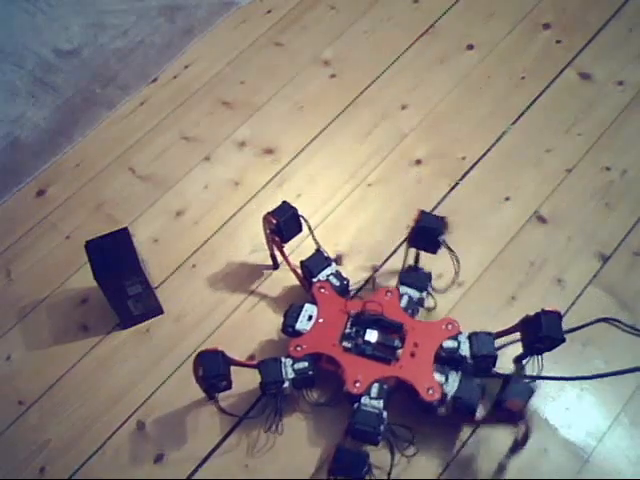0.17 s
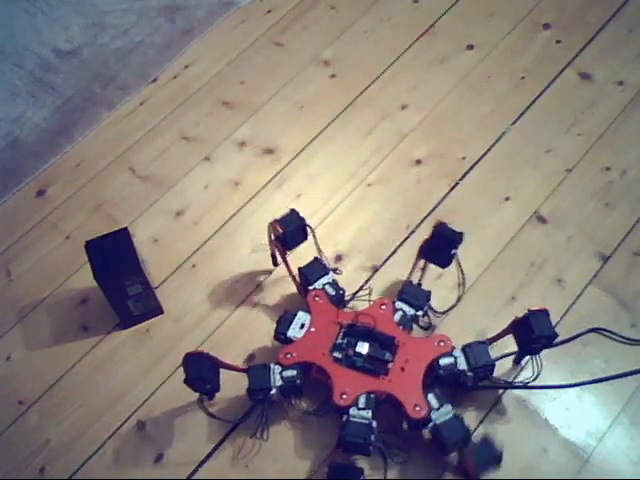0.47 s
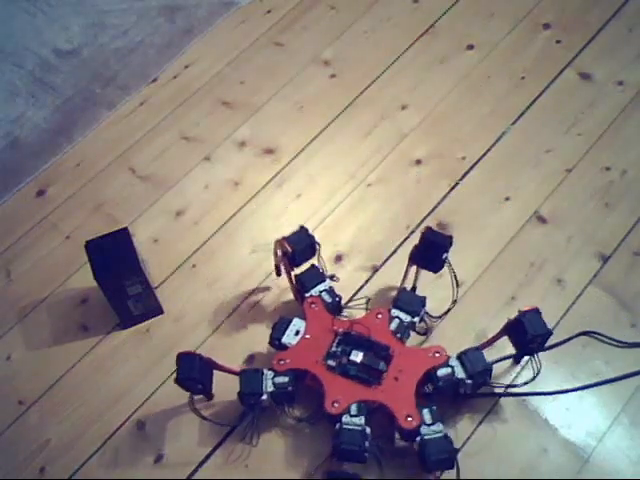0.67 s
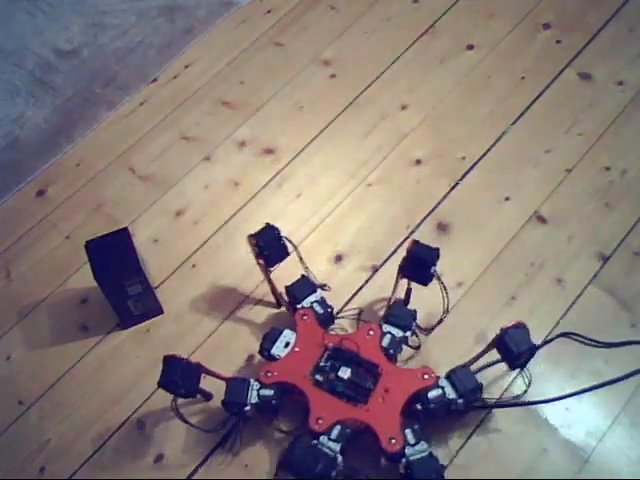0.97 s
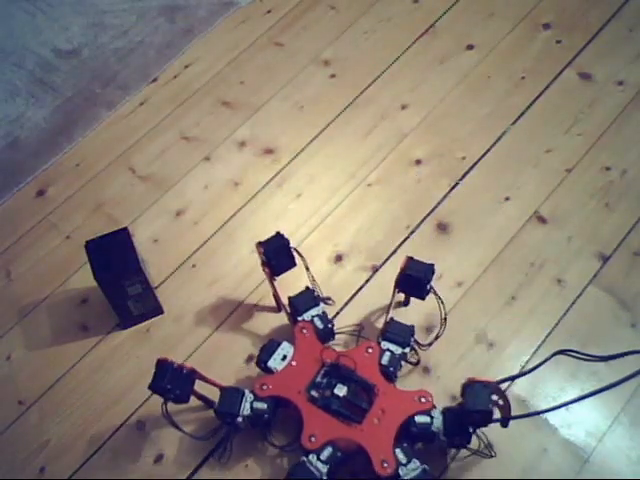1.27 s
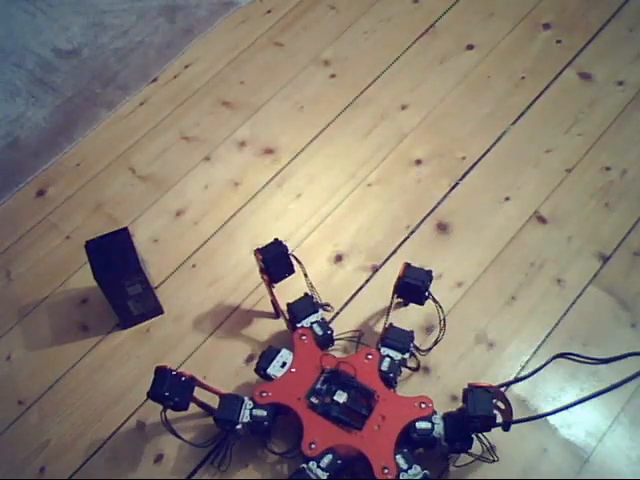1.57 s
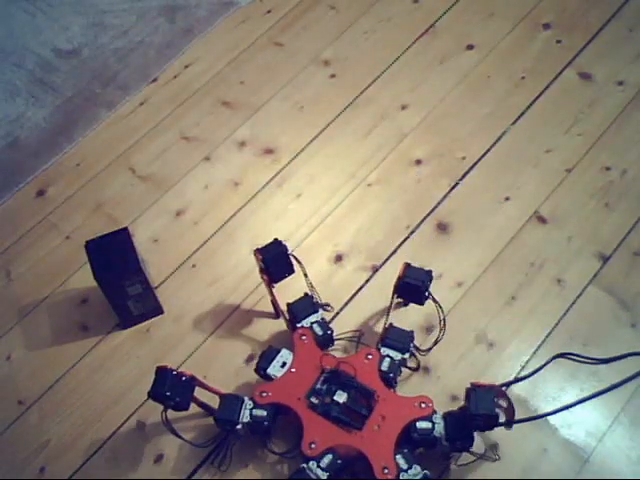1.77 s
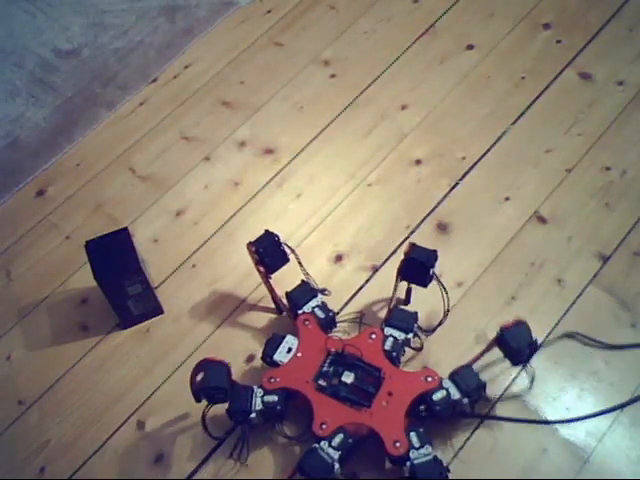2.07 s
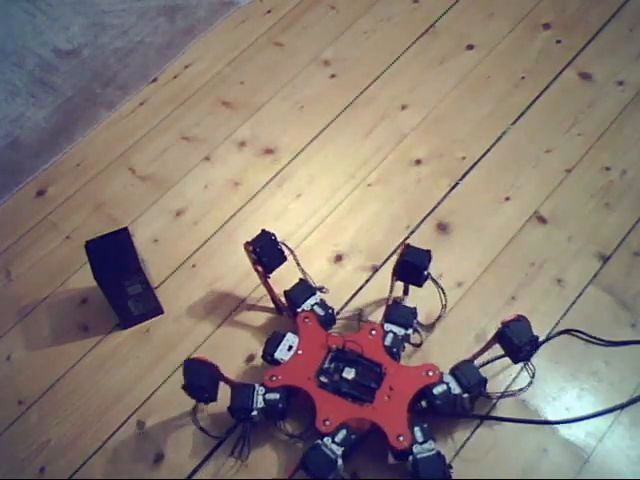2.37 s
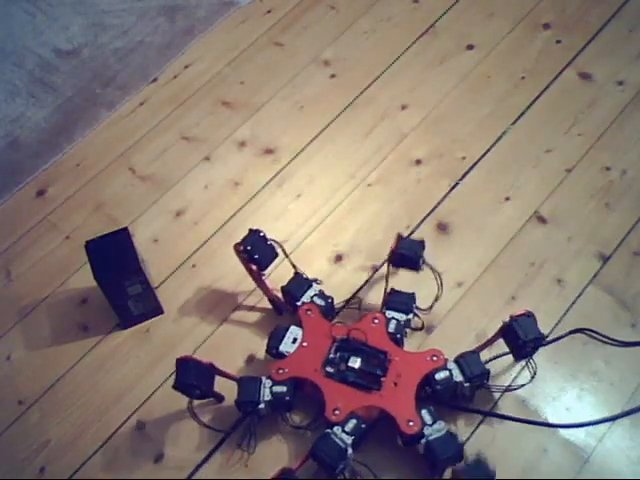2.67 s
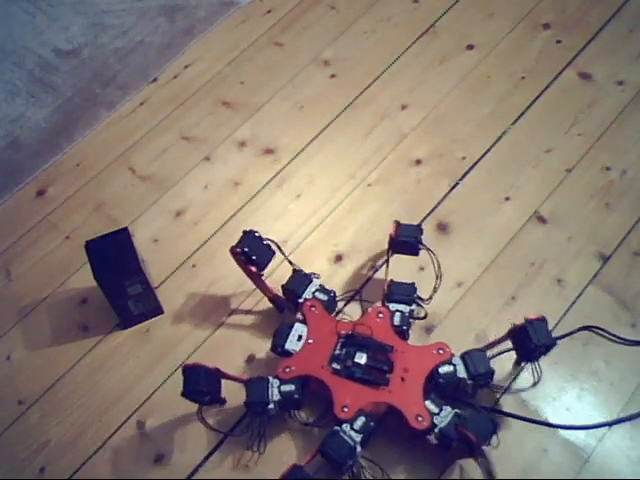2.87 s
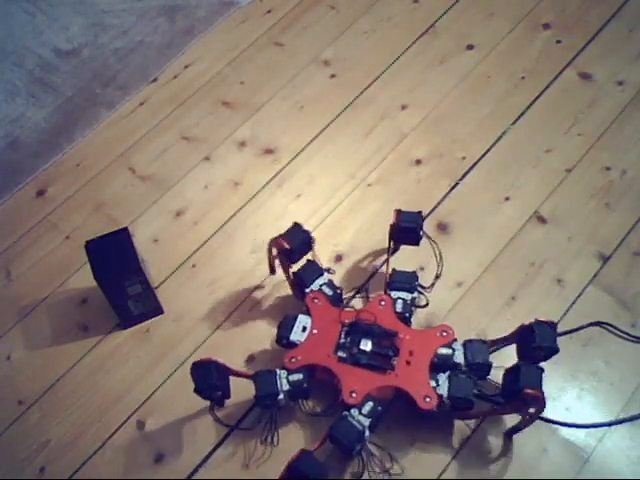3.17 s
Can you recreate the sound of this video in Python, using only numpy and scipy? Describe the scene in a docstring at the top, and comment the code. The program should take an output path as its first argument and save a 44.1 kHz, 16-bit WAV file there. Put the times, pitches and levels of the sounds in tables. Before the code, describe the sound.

Small robot servo motors whirr and rasp in short bursts, pausing twice on a wooden floor indoors

```python
"""In a small room with a wooden floor, a six-legged robot walks, pausing twice.
Its servos run in short bursts: gear teeth tick and rasp in plastic housings, and a whine follows each motor's speed.
Some gears sing out above the rasp, and slack gears snap over as a leg stops.
Servos that hold a load sing at their drive frequency; feet knock and scuff the boards.
A low rumble with a faint hiss fills the room."""
import sys
import numpy as np
from scipy import signal
from scipy.fft import rfft, irfft, next_fast_len
from scipy.io import wavfile

SR = 44100
rng = np.random.default_rng(int(sys.argv[2]) if len(sys.argv) > 2 else 0)


def to_wav(sig):
    """Store sig (one row per channel, or 1-D mono) as 16-bit WAV at the path in sys.argv[1].

    Samples outside -1..1 are clipped; the rate is SR.
    """
    pcm = np.clip(np.atleast_2d(sig), -1, 1) * 32767
    pcm = np.round(pcm).astype(np.int16)
    wavfile.write(sys.argv[1], SR, pcm.T)  # frames by channels


N = 145971  # samples, about 3.3 s
ROOM_T60_S, ROOM_DB = 0.3, -5.5  # time for the room's tail to fall by 60 dB; its level beside the direct sound

# Leg moves: (start [s], length [s], level before the sag [dB], tooth rate at full speed [Hz],
# gear wobble at full speed [Hz], treble boost [dB], ringing of that leg [Hz], its strength [dB])
MOVES = [(-.06, 0.22, -40.5, 891, 120.3, 2.5, 6570, -14), (0.188, 0.12, -39.5, 891.2, 95.2, 3.5, 6830, -14),
         (0.315, 0.17, -44, 842, 60, 2, 6800, -18.5), (0.486, 0.12, -37.5, 1255, 69.2, 1, 8150, -12),
         (0.601, 0.14, -41, 1133, 107, 2, 6780, -23), (0.693, 0.085, -39, 1484, 161, 0, 8700, -7),
         (0.791, 0.12, -39, 1158, 93, 1.5, 7650, -12), (0.907, 0.2, -44, 972, 49.6, -0.5, 5880, -10),
         (1.094, 0.16, -34.5, 1098, 150, 1.5, 6840, -11), (1.235, 0.16, -37, 1301, 83.56, 0.5, 7450, -12),
         (1.387, 0.026, -39.5, 711.6, 109, -4.5, 7000, -25.5), (1.88, 0.14, -39, 1204, 93, 0, 6730, -34),
         (2.018, 0.18, -42, 1335, 75.3, -1, 6640, -14.5), (2.378, 0.3, -45.5, 1075, 72, -1.5, 4630, -15.5),
         (2.687, 0.14, -36.5, 1015, 110.3, 6, 6720, -15), (2.83, 0.15, -40, 1196, 77.4, 1, 4840, -39),
         (2.993, 0.15, -40.5, 1163, 80, 0.5, 6900, -24), (3.146, 0.12, -41.5, 1088, 99, -3, 7000, -15)]
FRAME_HZ, FRAME_WIDTH_HZ, FRAME_DB = 1826.7, 520, -58.5
FRAME_FOLLOW = 0.28  # below 1, the drone changes less than the motors' effort


def servos():
    """All the leg moves, each from its own place in the room, and the drone that they stir in the frame."""
    out, effort = np.zeros((2, N))
    for start, *settings in MOVES:
        sound, push = move(*settings)
        add(out, start, room(bounce(sound), ROOM_DB))
        add(effort, start, push)
    drone = rng.standard_normal(N)
    for _ in range(2):
        drone = ring(drone, FRAME_HZ, FRAME_WIDTH_HZ)
    return out + amp(FRAME_DB) * unit(drone * effort ** FRAME_FOLLOW)


SPIN_UP_S, COAST_S, SAG_DB_PER_S = 0.052, 0.03, -9.5
SLOW_SHARE, SPEED_WAVER = 0.8, 0.02  # speed at the ends of a move, and its unsteadiness, as shares
WOBBLE, CHATTER_DB = 0.17, 1.0  # depth of the gear wobble; size of the faster loudness wander
TOOTH_SPREAD_DB, RASP_DB, LEG_WIDTH_HZ = 6, 9, 440
FIZZ_HZ = 12300  # the treble boost is full from here up
WHINE_DB, MESH_ROUGH = -12.5, 0.8  # level beside the gears; roughness 0-1
# Tones of the whine, before the housing colours them: (multiple of the tooth rate, level [dB])
WHINE_TONES = [(4, 5.5), (5, 6), (6, 10)]
# How the plastic housing colours sound: (frequency [Hz], relative level [dB])
HOUSING = [(300, -26), (1100, -14), (2600, -14), (3300, -10), (4000, -4.5), (4800, 1.5), (5900, -1.5),
           (6800, 2.5), (8200, 0.5), (10000, 2), (11050, -9.5), (13000, -16.5), (15500, -13.5)]


def move(length, db, tooth_hz, wobble_hz, fizz_db, leg_hz, leg_db):
    """One servo speeds up, slows and coasts: uneven ticks, sliding rasp, rough whine. Returns sound and effort."""
    t = np.arange(0, length + 5 * COAST_S, 1 / SR)
    spin_up = np.sin(np.pi / 2 * np.minimum(t / SPIN_UP_S, 1)) ** 2
    coast = np.exp(-np.maximum(t - length, 0) / COAST_S)
    effort = amp(db + SAG_DB_PER_S * t) * spin_up * coast

    arch = np.sin(np.pi * np.minimum(t / (length + COAST_S), 1))
    speed = (SLOW_SHARE + (1 - SLOW_SHARE) * arch) * (1 + SPEED_WAVER * drift(t, rate_hz=60))
    travel = np.cumsum(speed) / SR
    teeth = travel * tooth_hz  # running count of teeth

    strength, slide = rng.standard_normal((len(t), 2)).T
    tooth_passes = np.diff(np.floor(teeth), prepend=0)
    ticks = tooth_passes * amp(TOOTH_SPREAD_DB * np.clip(strength, -2, 2)) * np.sign(slide)
    rasp = slide * (0.96 + np.exp(-(teeth % 1) / 0.19))  # strongest just after each tooth meets
    gears = unit(ticks) + amp(RASP_DB) * unit(rasp)
    gears = shape(gears, lambda f: amp(fizz_db * np.minimum(f / FIZZ_HZ, 1) ** 4))
    gears = colour(gears, HOUSING)
    gears = unit(gears + amp(leg_db) * unit(ring(gears, leg_hz, LEG_WIDTH_HZ)))

    whine = sum(amp(level) * strand(k * teeth, MESH_ROUGH) for k, level in WHINE_TONES)
    whine = colour(whine, HOUSING)
    wobble = unit(1 + WOBBLE * np.sin(2 * np.pi * wobble_hz * travel))
    chatter = amp(CHATTER_DB * drift(t, rate_hz=350))
    return effort * wobble * chatter * (gears + amp(WHINE_DB) * whine), effort


BOUNCE_S, BOUNCE_SHIFT_S, BOUNCE_DB = 0.0016, 0.000163, -9.5  # average delay, its drift, echo level


def bounce(x):
    """The floor reflects a servo with a delay that shifts as the leg swings, so its colour keeps changing."""
    t = np.arange(len(x)) / SR
    delay = BOUNCE_S * (0.5 + rng.random()) + BOUNCE_SHIFT_S * drift(t, rate_hz=5.02)
    fine = signal.resample_poly(x, 4, 1)  # finer steps let the delay slide smoothly
    fine_t = np.linspace(0, len(x) / SR, len(fine), endpoint=False)
    echo = np.interp(t - delay, fine_t, fine, left=0)
    return (x + amp(BOUNCE_DB) * echo) / np.hypot(1, amp(BOUNCE_DB))


WHINE_WAVER, WHINE_ROOM_DB = 0.0036, -7.5  # pitch unsteadiness as a share; level of the room's tail
# Gears that sing out above the rasp: (start [s], length [s], pitch at start [Hz],
# in the middle [Hz], at the end [Hz], level [dB], roughness [0-1])
WHINES = [(0.088, 0.084, 2790, 2660, 2390, -59.5, .7), (.075, .095, 5400, 5230, 5050, -49.5, .5),
          (.82, 0.075, 5660, 5789, 5640, -48.5, .55), (.94, .11, 5700, 5750, 5400, -52, .55),
          (1.126, 0.131, 7000, 6640, 5890, -40.5, 0.7), (1.145, .095, 2850, 3290, 2800, -53, .35),
          (1.15, .105, 2680, 2770, 2370, -57, .45), (1.32, 0.0876, 4100, 3693, 3300, -56.5, .8),
          (1.92, 0.143, 3414, 3720, 3393, -54, .9), (2.101, 0.13, 4340, 4150, 3800, -55, 1),
          (2.849, 0.11, 4840, 4770, 4570, -48, 0.78), (3.182, 0.1, 2800, 3290, 2820, -61, .6)]


def whines():
    """A fast gear sings briefly, gliding with the speed of its motor."""
    out = np.zeros(N)
    for start, length, *pitch_hz, db, rough in WHINES:
        t = np.arange(0, length, 1 / SR)
        glide = np.polyfit([0, 0.5, 1], pitch_hz, 2)
        hz = np.polyval(glide, t / length) * (1 + WHINE_WAVER * drift(t, rate_hz=84.4))
        swell = np.sin(np.pi * t / length) ** 0.5
        add(out, start, amp(db) * swell * strand(np.cumsum(hz) / SR, rough))
    return out


WHINE_SPREAD = 0.065  # half width of a rough whine, as a share of its pitch


def strand(turns, rough):
    """A gear-mesh tone: a clean line, blurred by uneven teeth into a narrow band that glides with it."""
    t = np.arange(len(turns)) / SR
    spread_hz, rough = WHINE_SPREAD * turns[-1] / t[-1], np.clip(rough, 0, 1)
    phase = 2 * np.pi * turns
    blur = unit(drift(t, spread_hz) * np.cos(phase) + drift(t, spread_hz) * np.sin(phase))
    return np.sqrt(2 * (1 - rough ** 2)) * np.sin(phase) + rough * blur


SNAP_DECAY_S = 0.00092
# Slack gears snapping over as a leg stops: (time [s], peak level [dB])
SNAPS = [(0.782, -30), (1.4632, -31), (1.5068, -38)]


def snaps():
    """Slack gear teeth knock together once and tick the housing."""
    out, t = np.zeros(N), np.arange(SR // 50) / SR
    for start, db in SNAPS:
        tick = colour(rng.standard_normal(len(t)) * np.exp(-t / SNAP_DECAY_S), HOUSING)
        add(out, start, amp(db) * tick / abs(tick).max())
    return out


DRIVE_HZ, DRIVE_WAVER_DB = 1953, 1.1  # the waver grows with each harmonic
SECOND_DB, FIFTH_DB = -12, -11.5  # harmonics that are the same in every hold
HOLD_FADE_S = 0.02
# Servos holding a load: (start [s], length without the added fade time [s], level [dB],
# 3rd harmonic [dB], 4th harmonic [dB])
HOLDS = [(1.468, 0.0676, -66, 0, -10.5), (1.539, 0.063, -63.5, -12, -2), (1.6, 0.11, -64, 1, -13),
         (1.718, 0.1, -63, -15.5, -7), (1.832, 0.1, -60, -4, -9), (2.244, 0.3, -62.5, -7.5, -5),
         (2.55, 0.15, -57, -12, -29), (2.79, 0.47, -60, -12.5, -6)]


def holding():
    """The pulsed drive current makes loaded motors sing on one thin pitch; its overtones shift with the load."""
    out = np.zeros(N)
    for start, length, db, third_db, fourth_db in HOLDS:
        t = np.arange(0, length + HOLD_FADE_S, 1 / SR)
        turn = 2 * np.pi * DRIVE_HZ * (t + round(start * SR) / SR)  # all holds share one clock
        tone = np.zeros(len(t))
        for k, level in enumerate([0, SECOND_DB, third_db, fourth_db, FIFTH_DB]):
            waver_db = DRIVE_WAVER_DB * np.sqrt(k + 0.5) * drift(t, rate_hz=18)
            tone += amp(level + waver_db) * np.sin((k + 1) * turn)
        fade = np.minimum(np.minimum(t, t[-1] - t) / HOLD_FADE_S, 1)
        add(out, start, np.sqrt(2) * amp(db) * tone * fade)
    return out


SCUFF_GRAIN_DB = -0.5  # size of the quick loudness wander
# Feet knocking (short) or scuffing (long): (start [s], fade time [s], level before the fades [dB])
SCUFFS = [(.772, .009, -48), (1.12, .009, -47), (2.136, .011, -45.5), (2.165, .075, -55), (2.858, .04, -56)]
# How the floorboards sound: (frequency [Hz], relative level [dB])
BOARD = [(150, -18), (500, 6.5), (1100, 12), (1800, 4), (3500, -14), (9000, -42)]


def feet():
    """Each foot lands and slips in small grains that sound the floorboards."""
    out = np.zeros(N)
    for start, length, db in SCUFFS:
        t = np.arange(0, 3 * length, 1 / SR)
        grains = rng.standard_normal(len(t)) * amp(SCUFF_GRAIN_DB * drift(t, rate_hz=220))
        fade = np.minimum(t / 0.0033, 1) * np.exp(-(t / length) ** 2)
        add(out, start, amp(db) * colour(grains, BOARD) * fade)
    return out


FLOOR_DB, RUMBLE_TOP_HZ = -35, 60
# Room rumble and hiss: (frequency [Hz], relative level [dB])
ROOM_NOISE = [(14, 8), (25, 1.5), (45, -3), (75, -6), (100, -10), (135, -12.5), (170, -16), (250, -19.5),
              (400, -28), (870, -38.5), (1300, -44), (2200, -50), (6000, -46), (10000, -54), (12500, -63.5),
              (15500, -47.5)]
# Gain of the deepest rumble as time passes: (time [s], level [dB])
RUMBLE = [(0, -1), (.7, -1), (1, 2.5), (1.5, -4), (2.1, -1), (3.3, -3.5)]


def background():
    """Low rumble with a faint hiss above it; the deepest part swells, dips and partly returns."""
    noise = colour(rng.standard_normal(N), ROOM_NOISE)
    low = shape(noise, lambda f: 1 / (1 + (f / RUMBLE_TOP_HZ) ** 4))
    low_gain = amp(np.interp(np.arange(N) / SR, *np.transpose(RUMBLE)))
    noise = noise + low * (low_gain - 1)
    return amp(FLOOR_DB) * unit(shape(noise, lambda f: f ** 2 / (f ** 2 + 10 ** 2)))


def room(x, wet_db):
    """Adds a short tail of scattered reflections."""
    t = np.arange(SR // 2) / SR
    hits = rng.random(len(t)) < 3000 / SR  # about 3000 reflections a second
    taps = rng.standard_normal(len(t)) * hits * (t > 0.003) * amp(-60 * t / ROOM_T60_S)
    return signal.fftconvolve(x, (t == 0) + amp(wet_db) * taps / np.linalg.norm(taps))


def amp(db):
    """Decibels to gain."""
    return 10 ** (np.asarray(db) / 20)


def unit(x):
    """Scales to rms (average strength) 1."""
    return x / np.sqrt(np.mean(x ** 2) + 1e-20)


def add(mix, s, sound):
    """Mixes a sound in at a time in seconds, cutting off what falls outside."""
    at = round(s * SR)
    sound = sound[max(-at, 0):]
    part = mix[max(at, 0):][:len(sound)]
    part += sound[:len(part)]


def shape(x, gain):
    """Filters by a gain given as a function of frequency."""
    size = next_fast_len(len(x) + 2048)
    return irfft(rfft(x, size) * gain(np.fft.rfftfreq(size, 1 / SR)), size)[:len(x)]


def colour(x, points):
    """Filters a signal through a curve of (frequency [Hz], level [dB]) points, then scales it to rms 1."""
    hz, db = np.transpose(points)
    return unit(shape(x, lambda f: amp(np.interp(np.log(f + 1), np.log(hz), db))))


def ring(x, hz, width_hz):
    """One resonance with gain 1 at its peak."""
    return signal.lfilter(*signal.iirpeak(hz, hz / width_hz, SR), x)


def drift(t, rate_hz):
    """Smooth random wandering of about rms 1: 16 slow waves at rates up to rate_hz."""
    draw = rng.random((16, 2))
    waves = np.sin(2 * np.pi * (rate_hz * draw[:, :1] * t + draw[:, 1:]))
    return waves.sum(0) / np.sqrt(8)


def scene():
    """The robot in the room."""
    singing = room(whines(), WHINE_ROOM_DB)[:N]
    knocks = room(feet() + snaps(), ROOM_DB)[:N]
    return (servos() + singing + knocks + holding() + background())[None]


NOTCH_HZ, NOTCH_WIDTH_HZ, EDGE_HZ = 12000, 520, 15700


def record(dry):
    """Leaves a narrow gap in the treble around 12 kHz, then limits the band at the top."""
    x = shape(dry[0], lambda f: 1 - np.exp(-((f - NOTCH_HZ) / NOTCH_WIDTH_HZ) ** 2))
    low_pass = signal.firwin(511, EDGE_HZ, window=("kaiser", 9), fs=SR)
    return signal.oaconvolve(x, low_pass, "same")[None]


dry = scene()
out = record(dry)
to_wav(out)
```